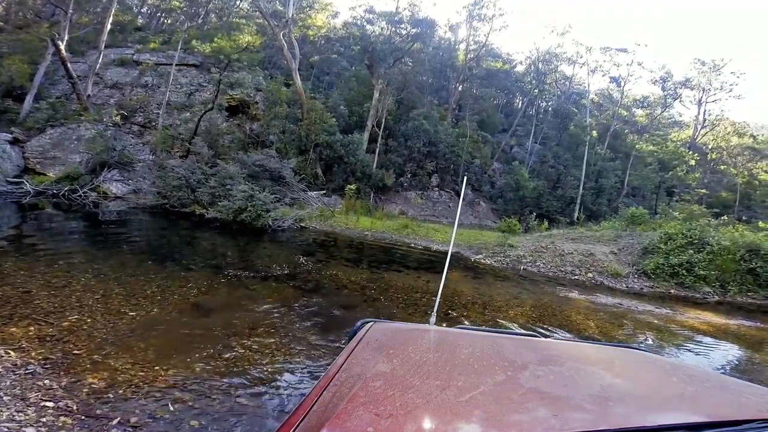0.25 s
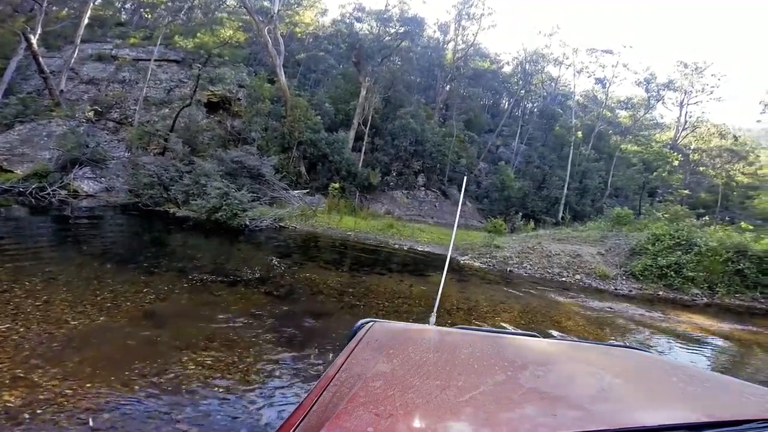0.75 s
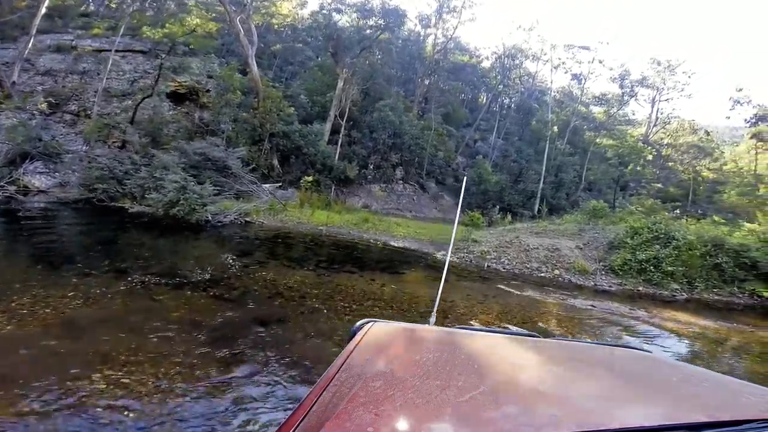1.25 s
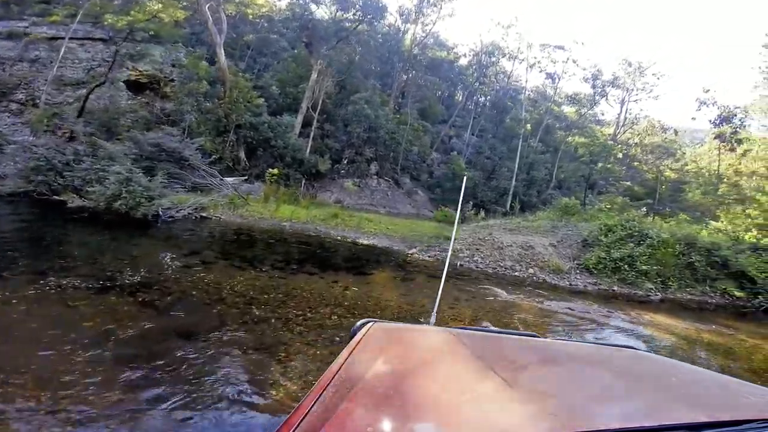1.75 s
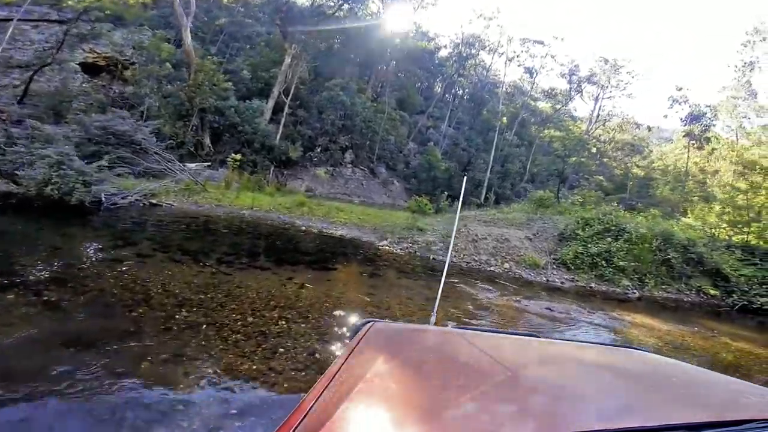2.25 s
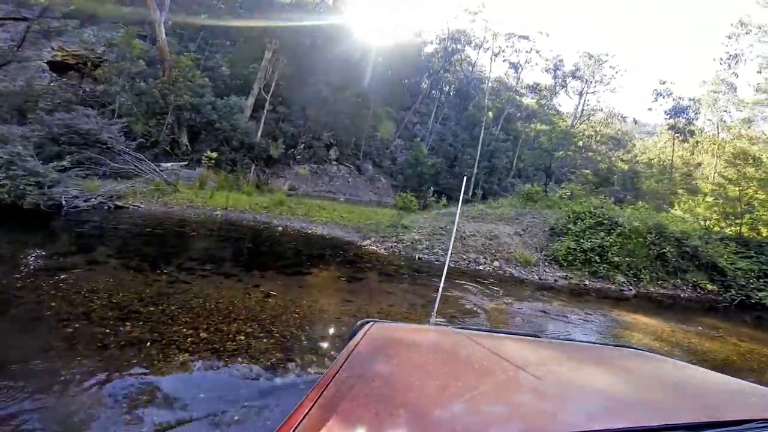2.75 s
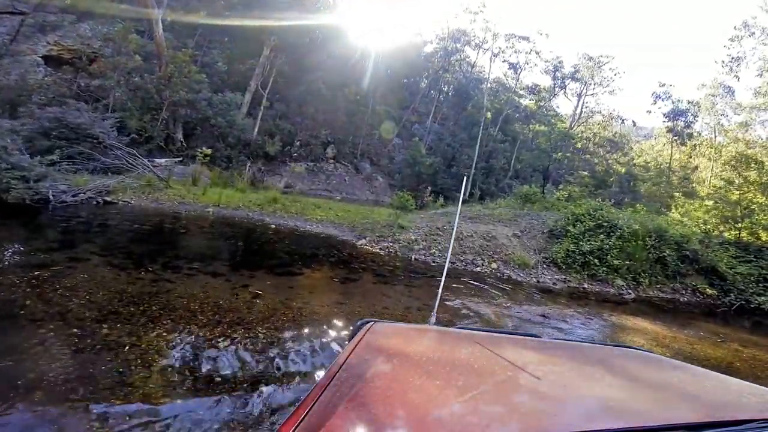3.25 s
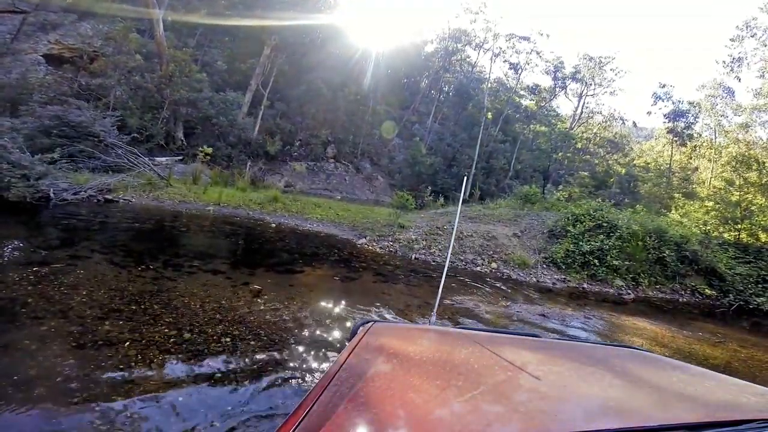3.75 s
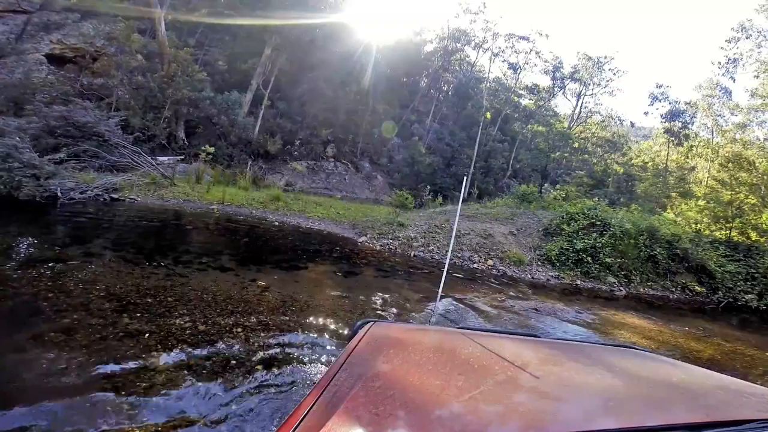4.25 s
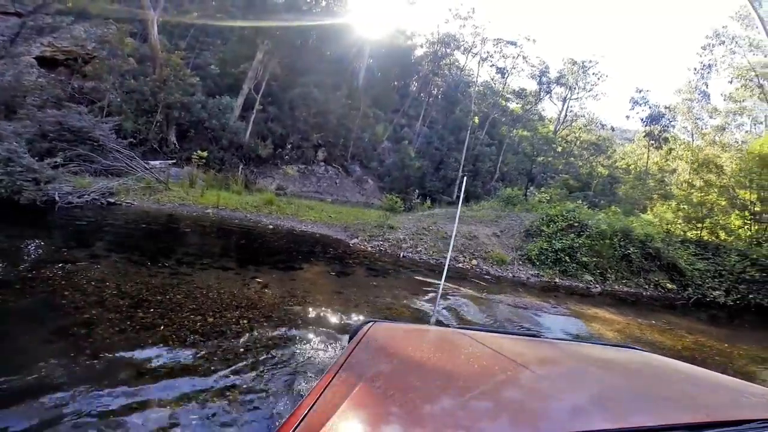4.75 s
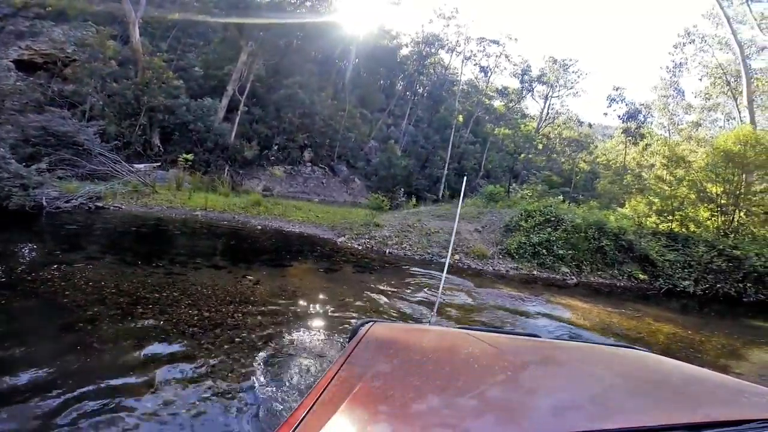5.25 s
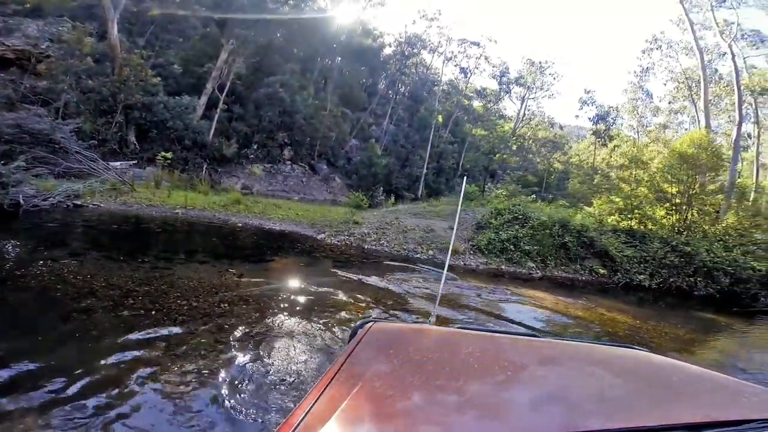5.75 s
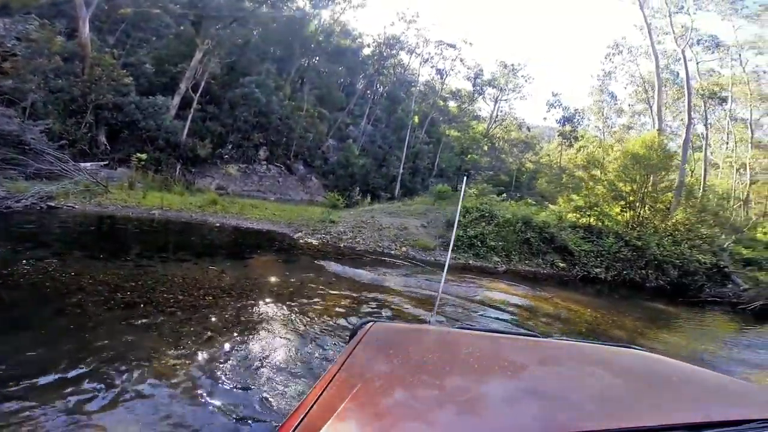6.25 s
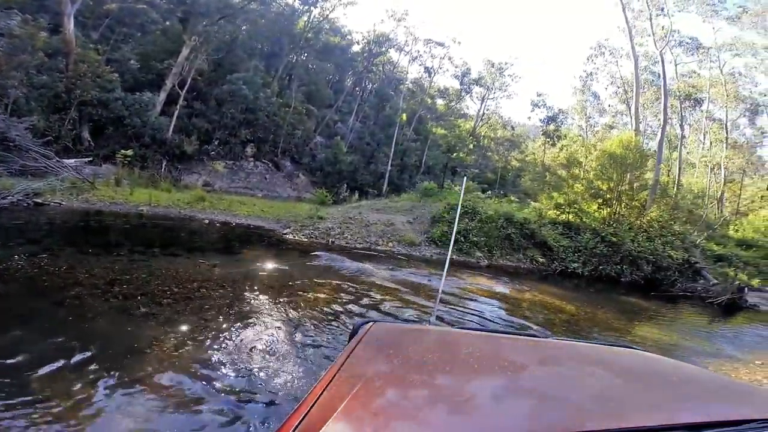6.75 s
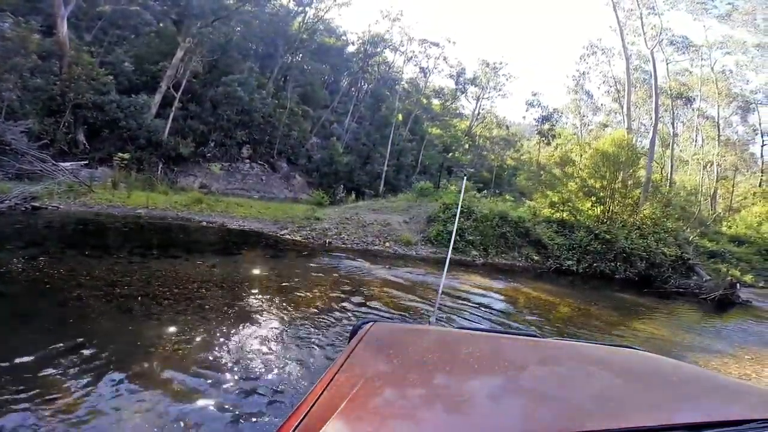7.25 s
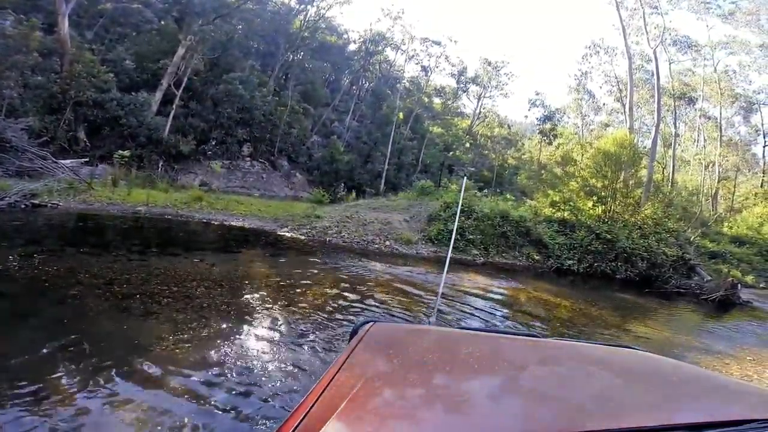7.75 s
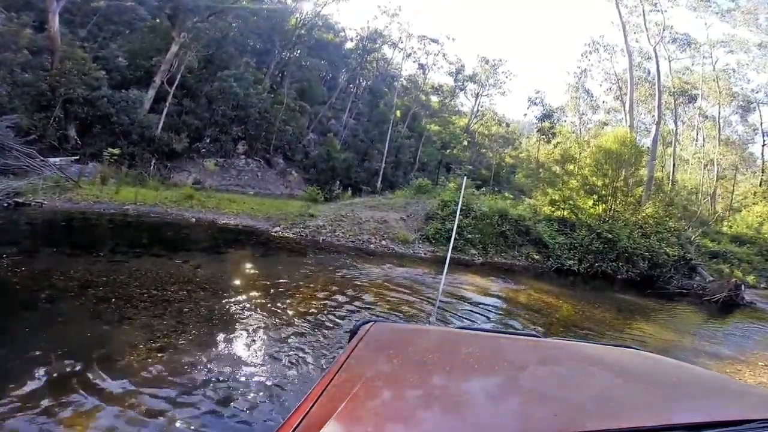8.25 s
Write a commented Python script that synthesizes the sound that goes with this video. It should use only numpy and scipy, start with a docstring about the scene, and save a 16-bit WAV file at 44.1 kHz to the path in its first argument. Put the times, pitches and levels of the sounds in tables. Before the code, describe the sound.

Deep, uneven engine drone from a slow off-road vehicle, tyres grinding on gravel, heavy hollow knocks in two bumpy stretches, and a soft water hiss.

```python
"""A six-cylinder off-road vehicle crawls through a shallow stony creek, heard from a camera on its body.
Crank orders are unsteady sines; lurches swell the body's lowest mode; knocks ring decaying chassis modes.
Gravel, water and scrapes are shaped noise, with bubbles as rising chirps. Belts, metal squeaks and camera
electronics are sines; accessory hiss and a throbbing insect are narrow noise bands."""
import sys
import numpy as np
from scipy import signal
from scipy.fft import rfft, irfft
from scipy.io import wavfile
from scipy.ndimage import uniform_filter1d

SR = 44100
rng = np.random.default_rng(int(sys.argv[2]) if len(sys.argv) > 2 else 0)


def ratio(d):
    """dB to gain"""
    e = np.asarray(d, float) / 20
    return 10 ** e


def output_pcm(signal):
    """Save a mono or channel-first signal as 16-bit PCM at the path in sys.argv[1].

    Samples are clipped to [-1, 1] before scaling.
    """
    pcm = np.clip(np.atleast_2d(signal).T, -1, 1) * 32767
    wavfile.write(sys.argv[1], SR, np.round(pcm).astype(np.int16))


N = 374850
TIME = np.arange(N) / SR

# lowest body mode, kept stirring by the gravel: pitch_hz, swing_db, level_db
BOOM_REST = (44, 1.74, -39)
# wheels knock on rocks: time_s, peak_db, ring_centre_hz
KNOCKS = [(2.99, -27.5, 400), (2.993, -22, 212), (3.003, -34, 270), (3.21, -34, 177.6), (3.394, -18, 135),
          (3.502, -29.5, 290), (3.726, -27, 210), (3.749, -22.5, 200.3), (3.764, -19.5, 170),
          (3.778, -15, 164), (3.79, -21.5, 170), (3.802, -23, 295.6), (3.828, -14, 149.8),
          (3.851, -21, 151), (3.872, -18, 135), (3.93, -23, 150), (4.402, -27, 199.7), (4.501, -34, 297.2),
          (4.573, -27, 250.3), (6.966, -21.5, 160), (7.162, -24.5, 320), (7.314, -33, 414),
          (7.318, -28, 287), (7.342, -29.5, 305.4), (7.365, -29.5, 293), (7.411, -26.5, 262),
          (7.47, -26, 160), (7.5, -24, 160), (7.807, -18, 70), (7.842, -24, 201), (7.924, -23, 229),
          (8.059, -16.5, 215), (8.061, -24, 350), (8.083, -27.5, 201.6)]
# drive through the creek: time_s, water_rush_db, tyre_grinding_db
WADING = [(0.0, -60, -38.5), (0.78, -60.5, -36.5), (1.16, -59.5, -39.5), (1.66, -59.5, -35.5),
          (2.3, -58.5, -36), (2.79, -59.5, -37), (3.45, -61, -41.5), (4.1, -59.5, -38), (4.7, -58.5, -37),
          (5.4, -60.5, -39), (6.08, -58, -40), (6.46, -60, -38), (6.89, -61.5, -40), (7.31, -61, -35.5),
          (7.6, -60, -41), (7.98, -60, -38.5), (8.5, -61.5, -36.5)]


def evened(x):
    """Scales to an rms of one."""
    return x / np.sqrt(np.mean(x ** 2) + 1e-20)


def columns(rows):
    """Interpolates each column after the first over the whole time."""
    s, *values = np.transpose(rows)
    return [np.interp(TIME, s, v) for v in values]


def add(mix, start_s, sound):
    """Mixes a sound in at start_s, cut at the end of the mix."""
    part = mix[round(start_s * SR):][:len(sound)]
    part += sound[:len(part)]


def wander(hz):
    """Slow random curve of rms one: noise lowpassed near hz."""
    control_rate_hz = 200
    steps = rng.standard_normal(int(N / SR * control_rate_hz) + 400)
    lowpass = signal.butter(2, np.clip(hz / (control_rate_hz / 2), .001, .9))
    slow = signal.filtfilt(*lowpass, steps)[200:]
    return evened(np.interp(TIME, np.arange(len(slow)) / control_rate_hz, slow))


def tone(hz):
    """Sine of rms one that follows a pitch curve from a random phase."""
    turns = np.cumsum(hz * np.ones(N)) / SR + rng.random()
    return np.sqrt(2) * np.sin(2 * np.pi * turns)


def fuzzy(hz, width_hz):
    """Noise in a narrow resonance around hz; rms one."""
    f = np.fft.rfftfreq(N, 1 / SR)
    resonance = 1 / (1 + (2 * (f - hz) / width_hz) ** 2)
    return evened(irfft(rfft(rng.standard_normal(N)) * resonance, N))


def noise(spectrum, size, patchy_db, lo_hz, hi_hz):
    """Random short-time spectra with drifting patches; rms one between lo_hz and hi_hz."""
    frames, hz = 4 * N // size + 12, np.fft.rfftfreq(size, 1 / SR)
    real, imag, patches = rng.standard_normal((frames, len(hz), 3)).T
    patches = uniform_filter1d(patches, size=16, axis=0)
    patches = evened(uniform_filter1d(patches, size=8, axis=1))
    f, db = np.transpose(spectrum)
    shape_db = np.interp(np.log(hz + 1), np.log(f + 1), db)[:, None]
    z = (real + 1j * imag) * ratio(shape_db + patchy_db * patches)
    out = signal.istft(z, nperseg=size, noverlap=3 * size // 4)[1][size:][:N]
    power = (abs(z) ** 2).sum(axis=1)
    in_band = (hz > lo_hz) & (hz < hi_hz)
    return evened(out) * np.sqrt(power.sum() / power[in_band].sum())


def engine():
    """Crank orders as unsteady sines; uneven firing makes each one swell and waver on its own."""
    # crankshaft: time_s, turns_per_s, load_db (third order), tenth_order_db
    crankshaft = [(0.0, 19.5, -42.5, -51), (0.6, 18.9, -49, -37), (0.9, 21.3, -50, -41.5),
                  (1.3, 20.6, -49, -41.5), (1.6, 21.3, -45, -45), (1.9, 23.3, -42, -55),
                  (2.15, 23.4, -41, -45), (2.5, 23, -39.5, -46.5), (2.7, 22.7, -55, -44),
                  (3.0, 19.3, -47, -54), (3.6, 21.3, -40.5, -54.5), (4.0, 20, -40.5, -40.5),
                  (4.25, 23, -35.5, -50.5), (4.5, 26.3, -37.5, -42), (4.7, 23, -39.5, -47),
                  (5.09, 20.6, -57, -43), (5.4, 20.8, -51, -45), (5.6, 24.4, -36, -50.5),
                  (5.9, 22.7, -37.5, -55), (6.25, 24.7, -36, -61), (6.5, 20.9, -63, -61),
                  (7.5, 21.1, -40.5, -48), (8.5, 21, -52, -58)]
    # other crank orders: multiple, relative_db
    other_orders = [(1, -7), (1.5, -22), (4, 0.5), (4.5, 1.5), (5, 4), (6, 0.5), (7, 2.5), (8, -6), (9, -1),
                    (11, -14.5), (12, -19), (13, -13)]
    turns_hz, load_db, tenth_db = columns(crankshaft)
    out = ratio(load_db + 2.2 * wander(6)) * tone(3 * turns_hz + 1.1 * wander(6))
    out += ratio(tenth_db + 2 * wander(6)) * tone(10 * turns_hz + 1.2 * wander(4))
    # the other orders follow the load only in part
    others_db = -51.5 + 0.28 * (load_db - load_db.mean())
    for k, db in other_orders:
        out += ratio(others_db + db + 2.5 * wander(5)) * tone(k * turns_hz + 1.1 * wander(5))
    return out


def lurches():
    """Power and pitch of the body's lowest mode: each lurch is a bell-shaped swell."""
    # body lurches: middle_s, peak_db, length_s, pitch_hz
    swells = [(0.058, -37, 0.076, 45.4), (0.313, -35, 0.16, 45.7), (0.534, -33.5, 0.093, 44.5),
              (0.882, -30.5, 0.059, 43.85), (0.984, -32, 0.059, 44.6), (1.297, -29, 0.082, 42.67),
              (1.455, -32, 0.092, 42.8), (1.57, -32.5, 0.13, 43.33), (1.699, -30, 0.18, 43.34),
              (2.046, -31, 0.15, 44.97), (2.211, -28, 0.11, 43.7), (2.366, -28, 0.12, 44.2),
              (2.514, -27.5, 0.16, 44.15), (2.95, -30.5, 0.076, 43.68), (3.089, -36, 0.12, 45.56),
              (3.238, -33, 0.075, 45.45), (3.401, -18.5, 0.072, 44.2), (3.5, -29.5, 0.087, 45.85),
              (3.639, -33.5, 0.044, 46.86), (3.773, -23.5, 0.048, 42.54), (3.869, -12, 0.1, 42.08),
              (4.014, -24.5, 0.058, 41.7), (4.108, -26, 0.048, 42.87), (4.291, -26, 0.12, 42.42),
              (4.46, -31.5, 0.12, 42.95), (4.647, -28.5, 0.063, 41.4), (4.8, -26.5, 0.12, 42.8),
              (5.025, -40, 0.28, 43.72), (5.516, -31.5, 0.13, 43.43), (5.723, -26.5, 0.13, 44.03),
              (5.937, -24.5, 0.29, 45.05), (6.326, -26.5, 0.22, 46.15), (6.576, -38.5, 0.13, 47.17),
              (6.847, -31.5, 0.067, 45.1), (7.018, -32, 0.11, 45.1), (7.34, -22.5, 0.039, 43.4),
              (7.424, -23.5, 0.07, 42.9), (7.508, -29, 0.071, 43.46), (7.604, -48, 0.098, 43.8),
              (7.936, -18, 0.14, 42.48), (8.149, -37, 0.16, 42.6), (8.253, -34, 0.049, 42.47),
              (8.413, -32.5, 0.072, 43.96)]
    squareness = 2.5  # 2 is a bell, more is flatter on top
    power = np.full(N, 1e-7)
    weighted_hz = power * BOOM_REST[0]
    for s, db, length_s, hz in swells:
        swell = ratio(2 * db) * np.exp(-abs(2 * (TIME - s) / length_s) ** squareness)
        power = power + swell
        weighted_hz = weighted_hz + swell * hz
    return power, uniform_filter1d(weighted_hz / power, size=2000)


def boom():
    """The lowest body mode; one-sided play in the rattling mount sharpens its crests."""
    power, hz = lurches()
    _, swing_db, rest_db = BOOM_REST
    rest_power = ratio(2 * (rest_db + swing_db * wander(6)))
    swing = np.sqrt(power + rest_power) * tone(hz + 0.8 * wander(7.9))
    rattle = 0.52 * (swing ** 2 - uniform_filter1d(swing ** 2, size=1000))
    return swing + rattle


def panel():
    """Body panel hum: a sine near 181 Hz, wavering in level and pitch."""
    level_db = -41.5 + 1.5 * wander(4) + 1.2 * wander(21)
    return ratio(level_db) * tone(181 * (1 + 0.003 * wander(2)))


def knocks():
    """Each blow is a soft push that rings the chassis modes nearest its centre."""
    # chassis modes: pitch_hz, relative_db, t60_s
    chassis = [(74.03, 11.5, 0.095), (135, 9.5, 0.064), (160, -0.5, 0.1), (189, -1.5, 0.06),
               (212.6, 4, 0.07), (271, -2.5, 0.062), (296, 5, 0.037), (350, -2.5, 0.055),
               (416, -3.5, 0.053), (520, -5.5, 0.042)]
    fall_db_per_octave = 25  # away from the centre of a blow
    crest_s = 0.00944  # into the push, where all modes crest together
    out, t = np.zeros(N), np.arange(SR // 3) / SR
    for s, peak_db, centre_hz in KNOCKS:
        ring = np.zeros(len(t))
        for hz, db, t60_s in chassis:
            tuned_hz = hz * (.98 + .04 * rng.random())
            mode_db = db - fall_db_per_octave * abs(np.log2(hz / centre_hz)) - 60 * t / t60_s
            ring += ratio(mode_db) * np.cos(2 * np.pi * tuned_hz * (t - crest_s))
        ring *= 1 - np.exp(-(t / 0.01) ** 2)  # rubber tyres give a rounded start
        add(out, s - .003, -ratio(peak_db) * ring / abs(ring).max())
    return out


def shaking():
    """Level of the chassis rumble: steady grinding plus a jolt at each knock and lurch."""
    knock_jolt_db, lurch_jolt_db, rise_s, fall_s = -13, -25, 0.0077, 0.024
    grinding_db = columns(WADING)[1] + 0.7 * wander(4.5)
    power = ratio(2 * grinding_db) + ratio(2 * lurch_jolt_db) * lurches()[0]
    for s, db, _ in KNOCKS:
        t = TIME - s
        jolt = np.clip(1 + t / rise_s, 0, 1) * np.exp(-np.maximum(t, 0) / fall_s)
        power += ratio(2 * (db + knock_jolt_db)) * jolt
    return np.sqrt(power)


def rumble():
    """Tyres grinding on gravel shake the chassis: low noise that follows the shaking."""
    # chassis rumble spectrum: frequency_hz, relative_db_per_hz
    spectrum = [(8, -21), (14, 4.5), (28, 7.5), (40, 3), (58, 3.5), (75, -3), (92, -7), (115, 1), (155, 5),
                (200, 1.5), (250, -8.5), (300, -7), (420, -36.5), (520, -53), (900, -87)]
    return shaking() * noise(spectrum, size=4096, patchy_db=1.5, lo_hz=60, hi_hz=400)


def water():
    """Water rushes past as swelling noise; its finest hiss is sprinkled with tiny drops."""
    # water rush spectrum: frequency_hz, relative_db_per_hz
    spectrum = [(200, -35), (350, 3.5), (500, -4.5), (780, -9.5), (900, -8.5), (1450, -10), (1750, -17.5),
                (2600, -17.5), (4500, -25), (6000, -26.5), (8300, -33), (10000, -35), (12000, -40),
                (14000, -44.5), (15000, -43)]
    rush_db = columns(WADING)[0]
    swell_db = rush_db - rush_db.mean() - 0.78 * wander(9.9)
    drops_per_s, drop_decay_s = 150, 0.0018
    drops = ratio(3.2 * np.minimum(rng.exponential(1, N), 3)) * (rng.random(N) < drops_per_s / SR)
    sprinkle = signal.lfilter([1], [1, -np.exp(-1 / (drop_decay_s * SR))], drops)
    rush = noise(spectrum, size=1024, patchy_db=-1.0, lo_hz=1000, hi_hz=5230)
    near = signal.sosfiltfilt(signal.butter(2, 5000, fs=SR, output="sos"), rush)
    # the finest hiss is spread wide and barely swells
    far = ratio(0.33 * swell_db + 0.9) * (rush - near) * (1 + 0.061 * sprinkle)
    return ratio(rush_db.mean()) * (ratio(swell_db) * near + far)


def trickle():
    """Bubbles burst beside the tyres: each starts sharply, rises in pitch and dies within a few cycles."""
    bubbles_per_s, decay_cycles, tilt_db_per_octave = 120, 4.2, -7.5
    pitches_hz = np.geomspace(1500, 9000, num=16)
    size = ratio(3.3 * np.minimum(rng.exponential(1, N), 4)) * (rng.random(N) < bubbles_per_s / SR)
    which, t = rng.integers(0, len(pitches_hz), N), np.arange(SR // 40) / SR
    out = np.zeros(N)
    for k, hz in enumerate(pitches_hz):
        chirp = np.sin(2 * np.pi * hz * t * (1 + 0.004 * hz * t))
        decay = np.exp(-hz * t / decay_cycles)
        bubble = ratio(tilt_db_per_octave * np.log2(hz / pitches_hz[0])) * decay * chirp
        out += signal.oaconvolve(size * (which == k), bubble)[:N]
    return ratio(-75.5) * evened(out)


def push_db():
    """Load on belts and fan: pushing harder through the water raises it with the rush level."""
    rush_db = columns(WADING)[0]
    return rush_db - rush_db.mean()


def belts():
    """Two belt-driven whines; random swings of level and pitch spread each into a fuzzy line."""
    # belt whines: drift_hz, level_db
    whine_rows = [(2.99, -66.5), (2.51, -66)]
    # slow pitch shifts: time_s, lower_hz, upper_hz
    pitch_rows = [(0, 617, 707), (1.2, 621, 710), (1.6, 615.3, 692), (2.7, 608, 697), (3.6, 615.3, 705),
                  (4.9, 611.2, 696), (6.1, 610, 698.5), (6.6, 608.2, 710.6), (8.5, 617, 709.4)]
    out, load_db = np.zeros(N), 0.95 * push_db()
    for hz, (drift_hz, db) in zip(columns(pitch_rows), whine_rows):
        swing = 0.95 + 0.36 * wander(30)
        out += ratio(db + load_db) * swing * tone(hz + drift_hz * wander(2.53))
    return out


def fan():
    """Fan hum: narrow noise bands that swell with the load."""
    # fan bands: centre_hz, width_hz, relative_db
    bands = [(1410, 17, -4.5), (1457, 117, -3.5)]
    level_db = -64 + 1.5 * push_db() + 0.7 * wander(1.8)
    return ratio(level_db) * sum(ratio(db) * fuzzy(hz, width_hz) for hz, width_hz, db in bands)


def accessories():
    """Fans and resonant hiss: steady narrow noise bands."""
    # accessory bands: centre_hz, width_hz, level_db
    bands = [(622, 170, -68), (720, 76, -69), (786, 16, -70), (1138, 12, -74.5), (1980, 440, -70),
             (4470, 730, -76.5), (5620, 20, -84.5)]
    return sum(ratio(db) * fuzzy(hz, width_hz) for hz, width_hz, db in bands)


def squeaks():
    """Short metal squeaks: sine bursts with a random phase walk and a scratchy level."""
    # squeaks: start_s, pitch_hz, level_db, length_s
    bursts = [(3.484, 2100, -54.5, 0.036), (3.753, 4130, -60.5, 0.03), (5.886, 4150, -68, 0.009),
              (6.887, 6930, -67, 0.01), (6.953, 4300, -66, 0.01), (7.407, 2500, -62, 0.011)]
    out = np.zeros(N)
    for s, hz, db, length_s in bursts:
        t = np.arange(0, length_s, 1 / SR)
        phase = 2 * np.pi * hz * t + 0.035 * np.cumsum(rng.standard_normal(len(t)))
        envelope = np.sin(np.pi * (t / length_s) ** .6)
        add(out, s, np.sqrt(2) * ratio(db) * np.sin(phase) * envelope)
    return out * (1 + .3 * wander(90))


def brake_squeal():
    """A high sine whose grip catches and lets go 28 times a second."""
    # brake squeal: time_s, pitch_hz, relative_db
    path = [(2.66, 7610, -90), (2.674, 7700, -90), (2.798, 7770, -65.5), (2.892, 7740, -65),
            (2.914, 7650, -76), (2.988, 7750, -69), (3.21, 7720, -91.5), (3.3, 7720, -84)]
    hz, db = columns(path)
    stutter = np.sin(2 * np.pi * 28 * (TIME - 2.8))
    grip = np.clip(1.44 + 1.35 * stutter + 0.31 * wander(30), .1, 1)
    sounding = (TIME > path[0][0]) & (TIME < path[-1][0])
    return ratio(db) * grip * sounding * tone(hz)


def scrapes():
    """Gravel scrapes and rattles under the blows: grainy noise bursts with a soft rise and fall."""
    # scrapes: start_s, length_s, relative_db
    bursts = [(3.483, 0.034, -55.5), (3.725, 0.08, -54), (3.771, 0.13, -51.5), (5.988, 0.1, -59),
              (7.147, 0.051, -60), (7.303, 0.035, -51), (7.355, 0.043, -57), (7.401, 0.054, -58)]
    # gravel spectrum: frequency_hz, relative_db_per_hz
    spectrum = [(300, -21), (700, -6), (1200, 0), (1500, 2), (2000, -3), (3000, -8), (4600, -10),
                (5500, -36)]
    grit = noise(spectrum, size=256, patchy_db=1.2, lo_hz=1000, hi_hz=5032)
    gate = np.zeros(N)
    for s, length_s, db in bursts:
        rise = np.clip((TIME - s) / 0.028, 0, 1)
        fall = np.exp(-(2.27 * np.maximum(TIME - s - .02, 0) / length_s) ** 2)
        gate += ratio(db) * rise * fall
    spatter = ratio(1.2 * wander(40))
    return grit * gate * spatter


def insect():
    """An insect on the bank: thin high hiss in quick uneven throbs."""
    # buzzes: start_s, end_s, relative_db
    buzzes = [(3.42, 3.62, -76), (5.03, 5.146, -74.5), (5.19, 5.318, -76), (6.964, 7.159, -76)]
    # buzz bands: centre_hz, width_hz, relative_db
    bands = [(9250, 1800, -3), (13200, 1500, -9)]
    hiss = sum(ratio(db) * fuzzy(hz, width_hz) for hz, width_hz, db in bands)
    throb = ratio(3.5 * np.sin(2 * np.pi * 30 * TIME + 0.8 * wander(5.92)) + 2.2 * wander(50))
    gate = np.zeros(N)
    for start_s, end_s, db in buzzes:
        gate += ratio(db) * np.clip(np.minimum(TIME - start_s, end_s - TIME) / 0.014, 0, 1)
    return hiss * throb * gate


def camera():
    """Camera electronics: steady sines, and a narrow hiss that starts and decays once a frame."""
    # tones in groups spaced by about the frame rate: pitch_hz, level_db
    tones = [(2937.3, -88), (5814, -96), (5844.2, -79), (5873.9, -86), (5904.1, -94), (8720.9, -97),
             (8751.2, -96), (8781.5, -79), (11688.5, -89), (11718.1, -84), (11748.4, -98), (14625.1, -91),
             (14655.4, -98)]
    # frame hiss: centre_hz, width_hz, relative_db, frames_per_s
    frame_hiss = (11240, 250, -80, 29.97)
    # slow level of the frame hiss: time_s, relative_db
    hiss_fade = [(0, -4), (5.2, -4), (5.8, -6), (8.5, -1)]
    hz, width_hz, hiss_db, frames_per_s = frame_hiss
    decay = np.exp(-(TIME * frames_per_s % 1) / 0.35)
    ticking = ratio(hiss_db + columns(hiss_fade)[0]) * fuzzy(hz, width_hz) * decay
    return ticking + sum(ratio(db) * tone(hz) for hz, db in tones)


def scene():
    """All sources, one microphone."""
    vehicle = engine() + boom() + panel() + knocks()
    creek = rumble() + water() + trickle()
    whines = belts() + fan() + accessories()
    details = squeaks() + brake_squeal() + scrapes() + insect() + camera()
    return (vehicle + creek + whines + details)[None]


def low_pass(x):
    """Removes everything above the highest recorded frequency."""
    return signal.sosfilt(signal.butter(12, 14930, fs=SR, output="sos"), x)


def record(dry):
    """The preamplifier rounds off the highest crests."""
    rounded = dry / (1 + (abs(dry) / .48) ** 6) ** (1 / 6)
    return low_pass(rounded)


dry = scene()
out = record(dry)
output_pcm(out)
```